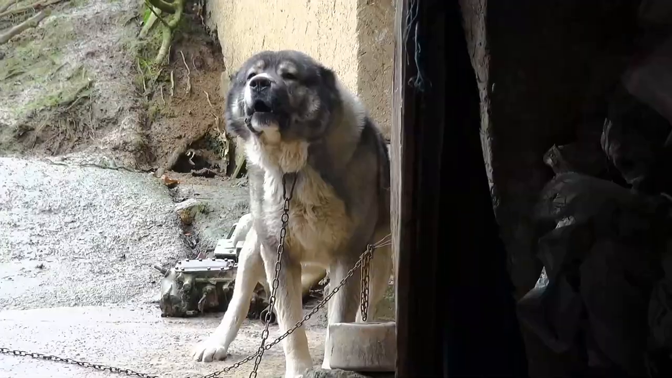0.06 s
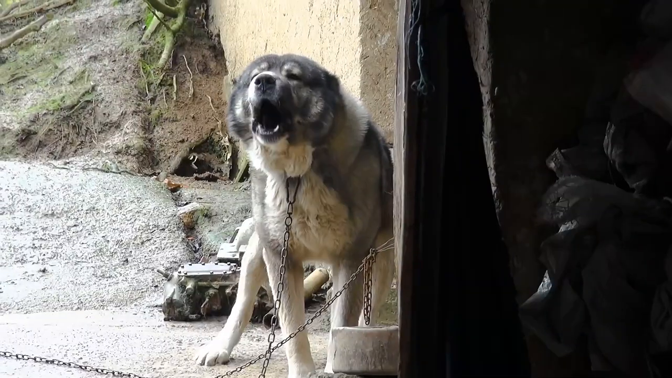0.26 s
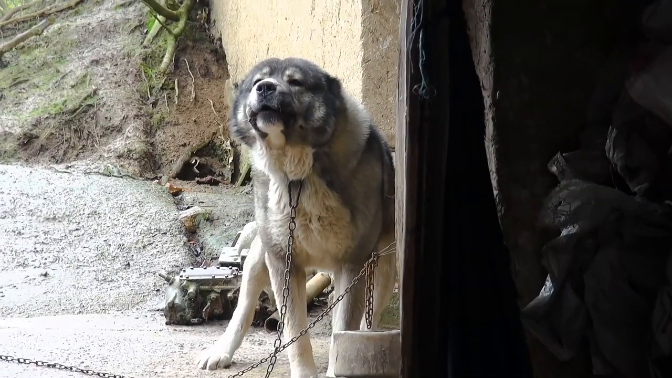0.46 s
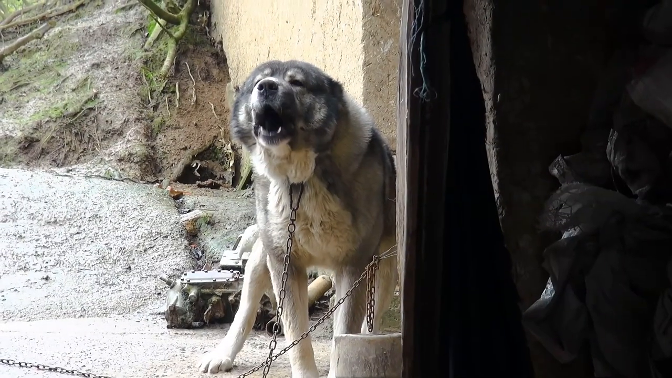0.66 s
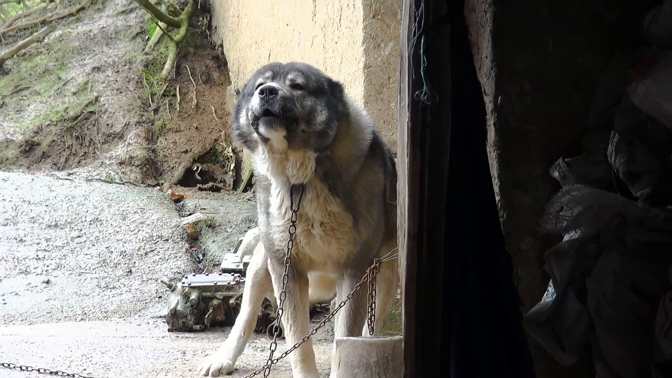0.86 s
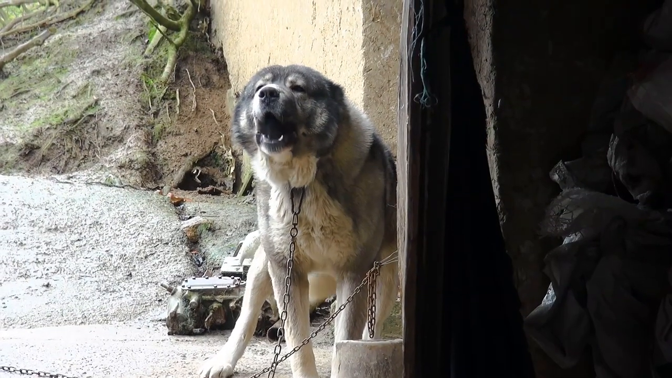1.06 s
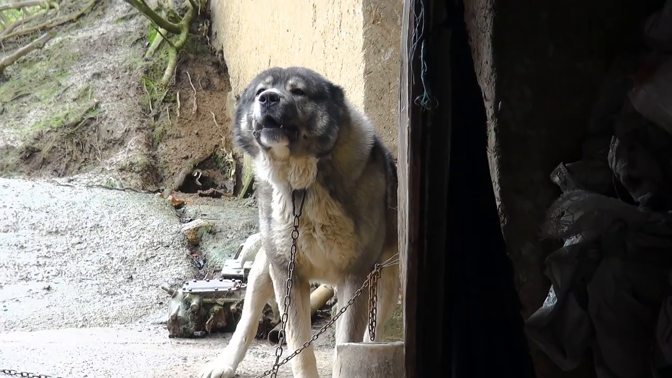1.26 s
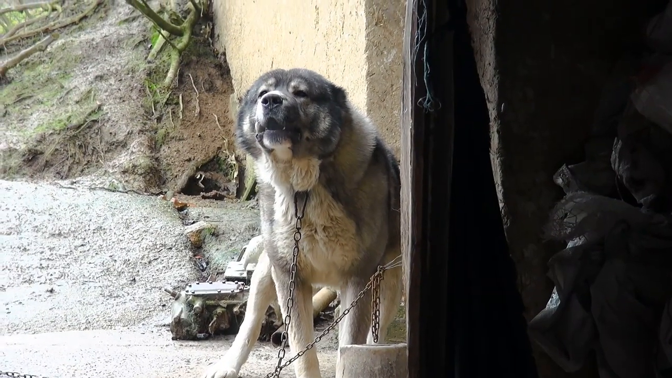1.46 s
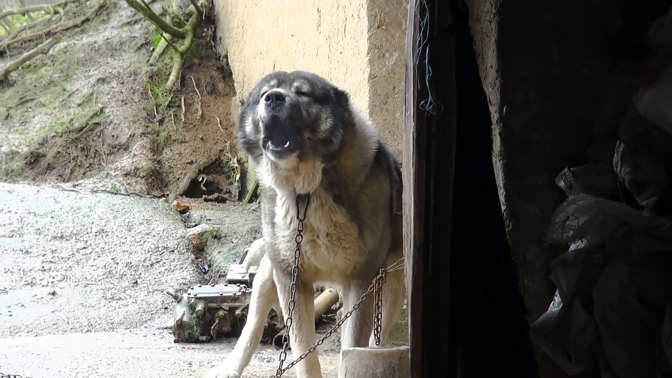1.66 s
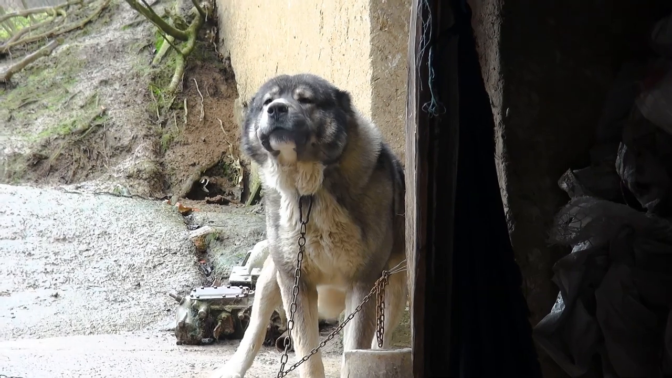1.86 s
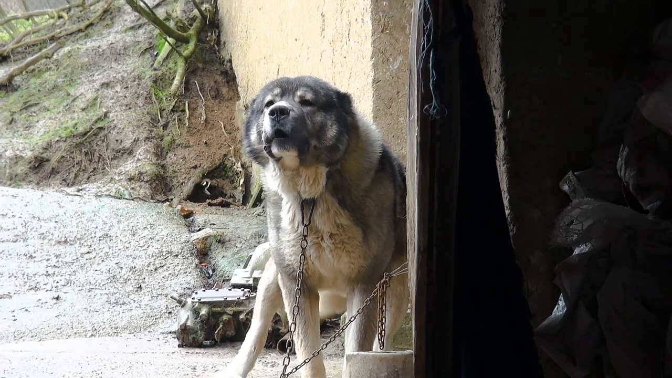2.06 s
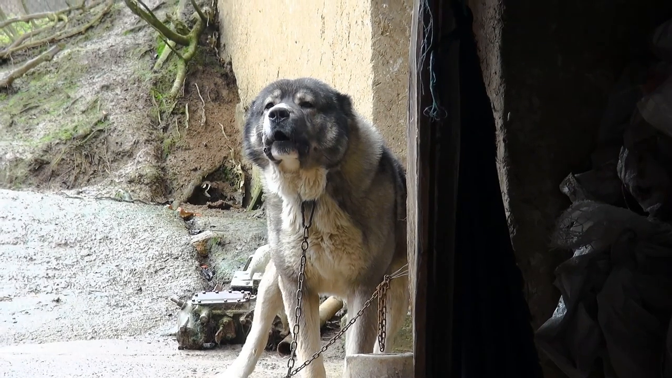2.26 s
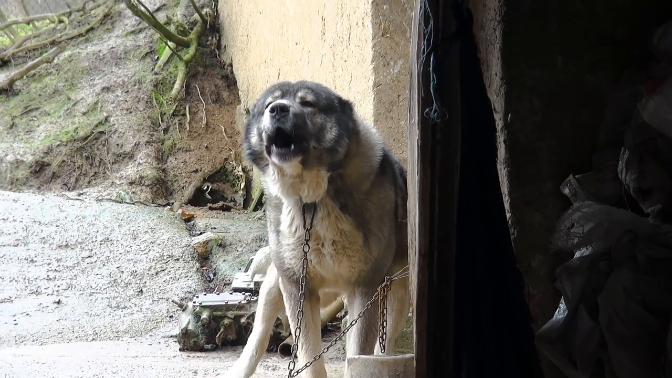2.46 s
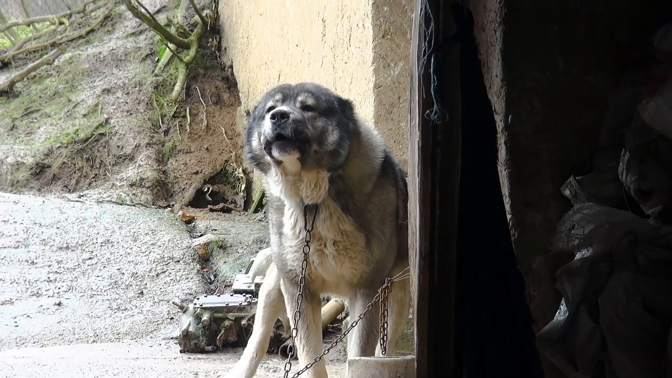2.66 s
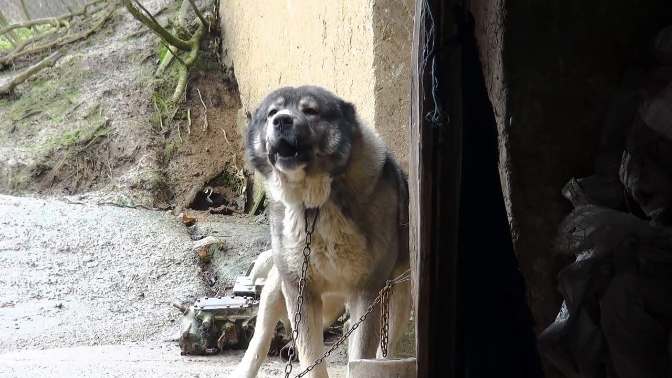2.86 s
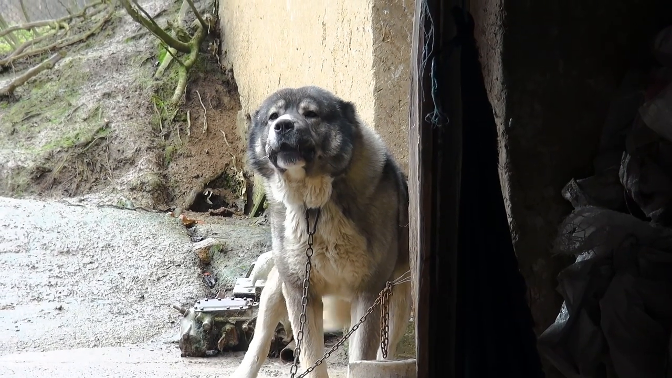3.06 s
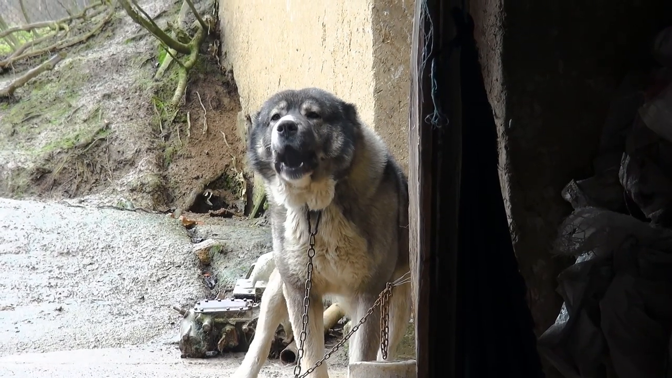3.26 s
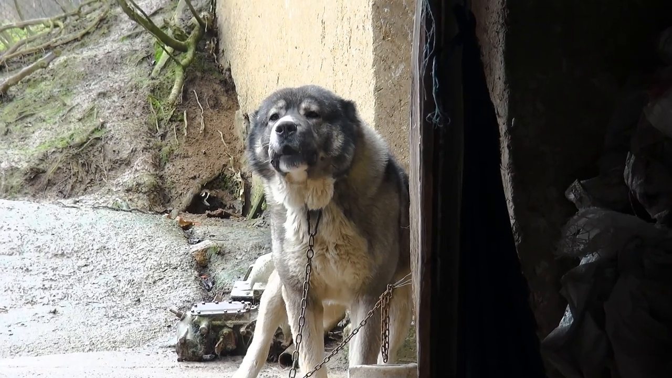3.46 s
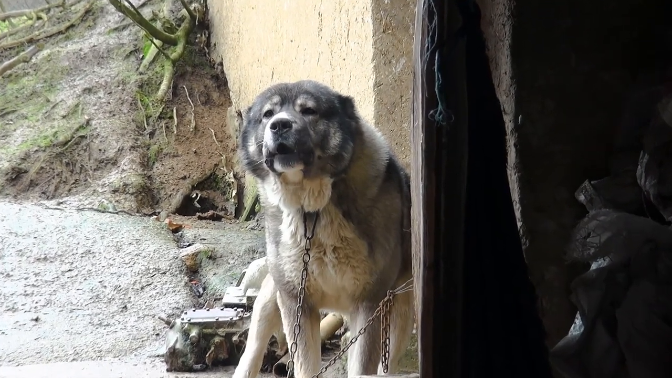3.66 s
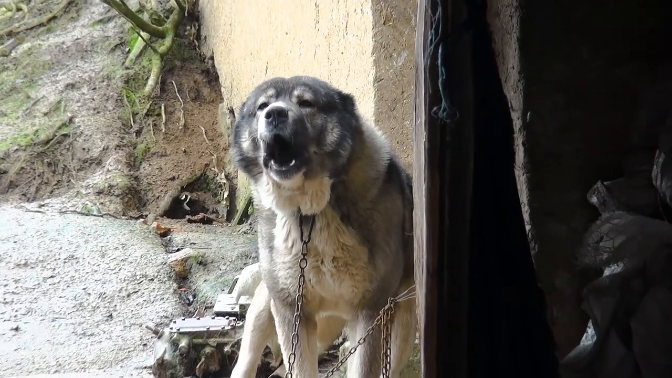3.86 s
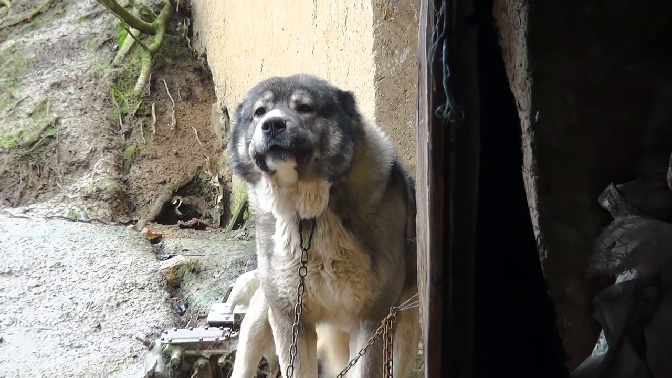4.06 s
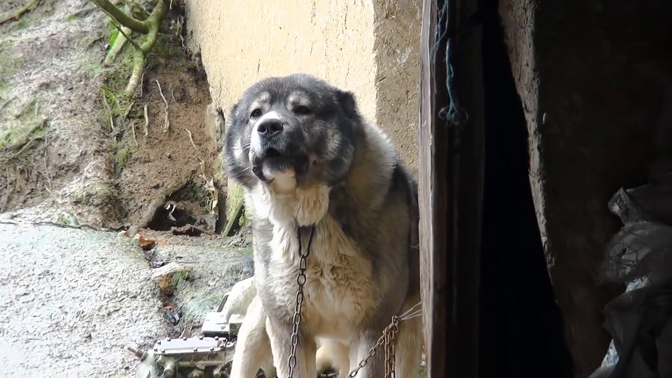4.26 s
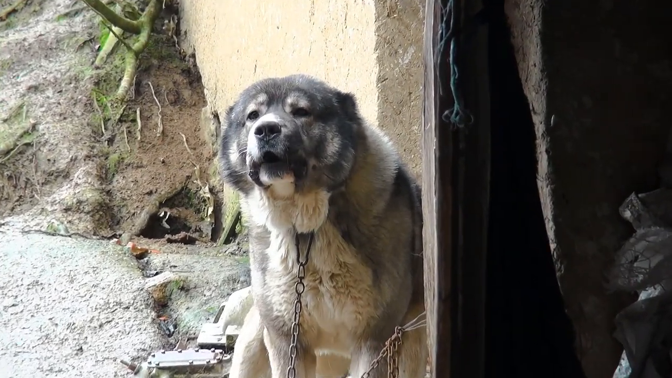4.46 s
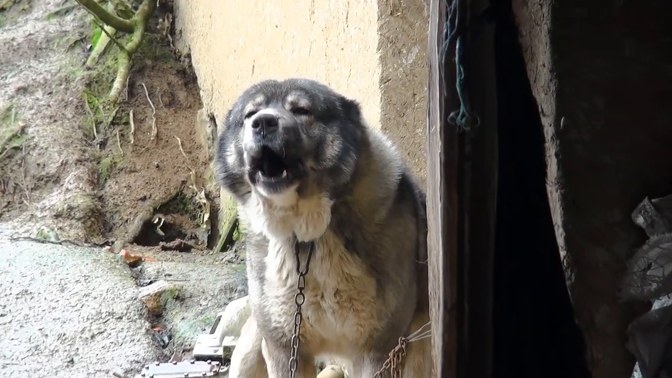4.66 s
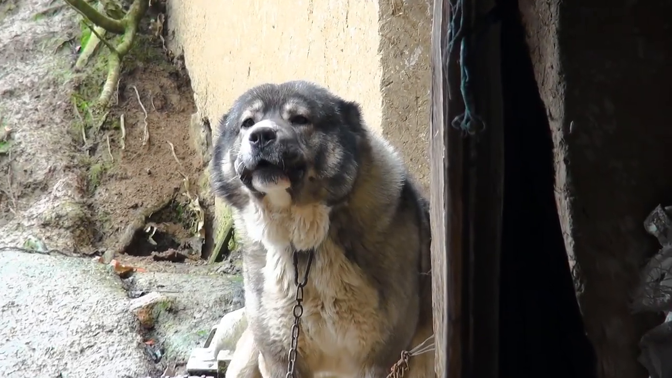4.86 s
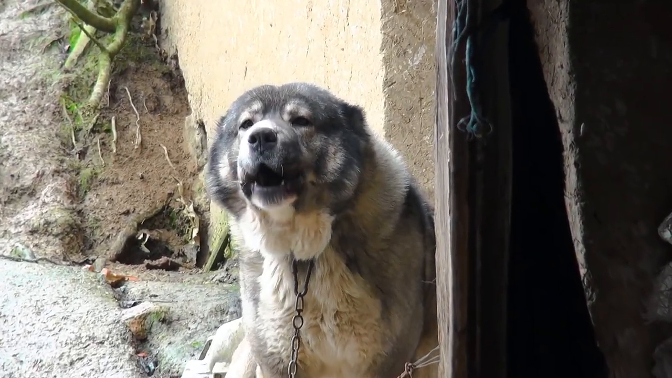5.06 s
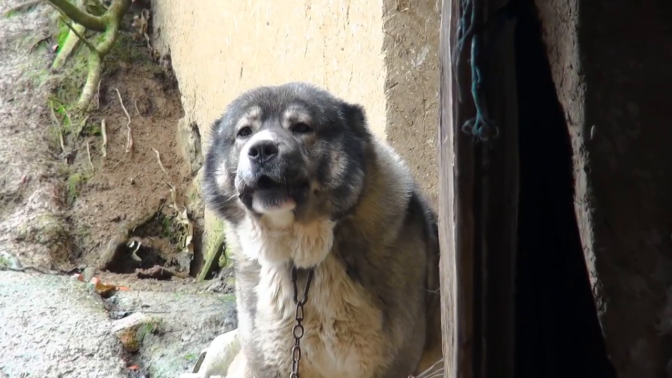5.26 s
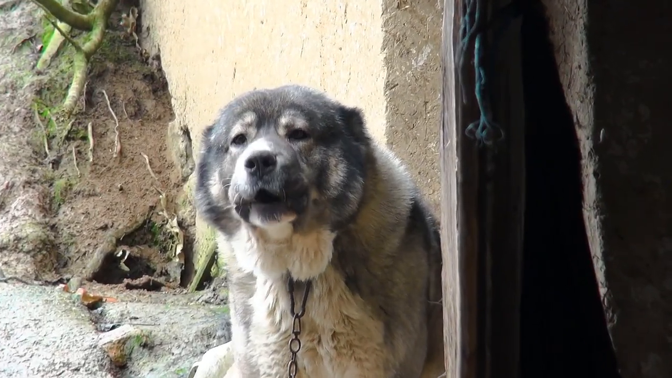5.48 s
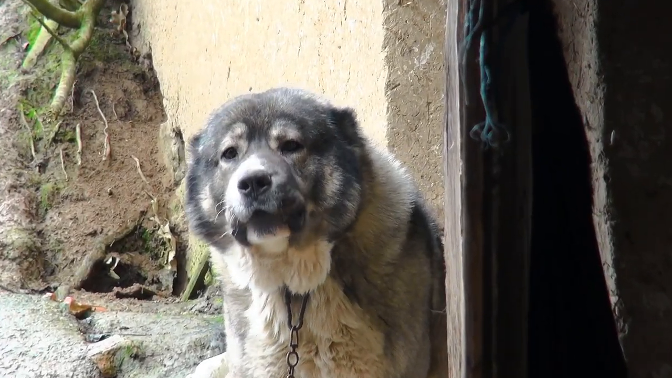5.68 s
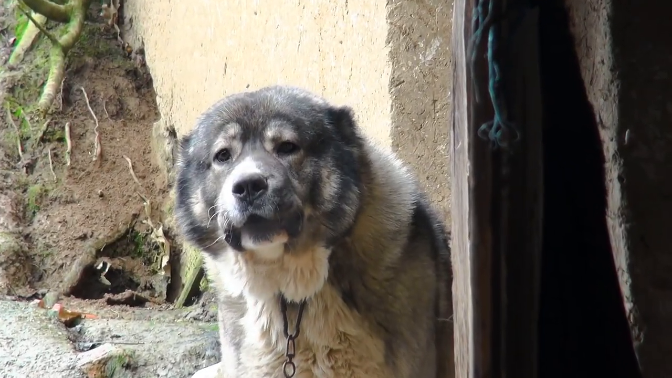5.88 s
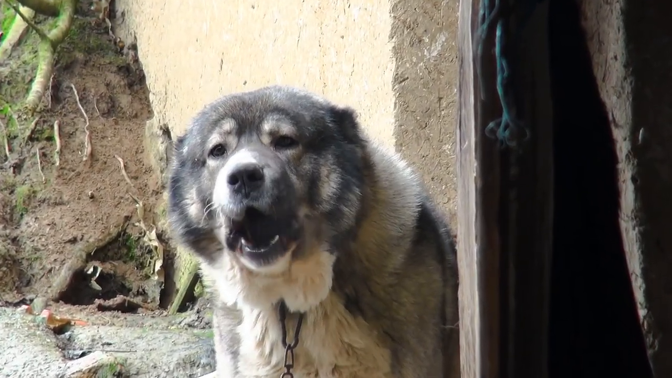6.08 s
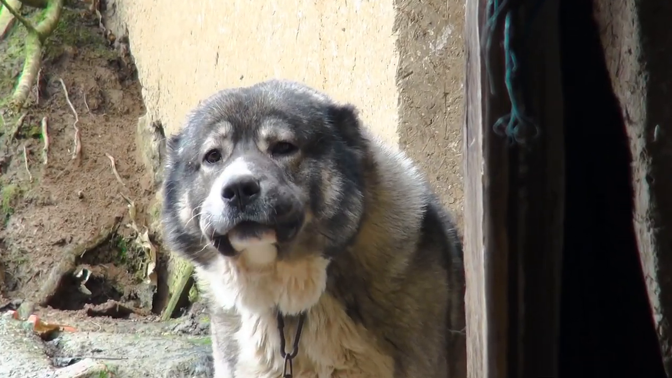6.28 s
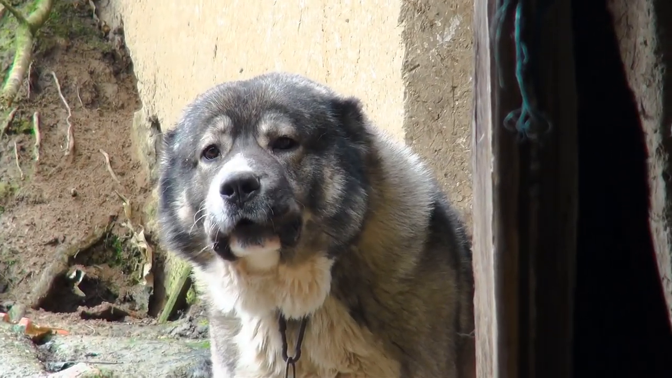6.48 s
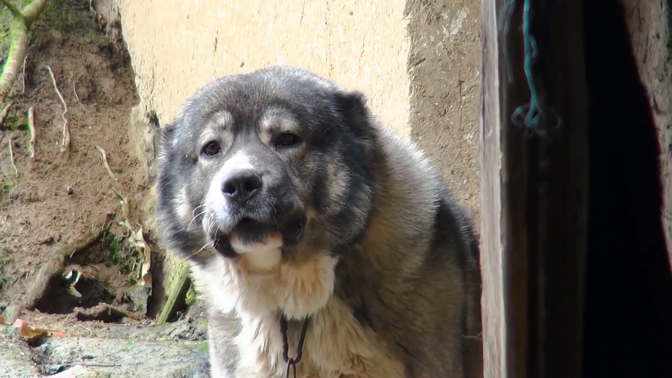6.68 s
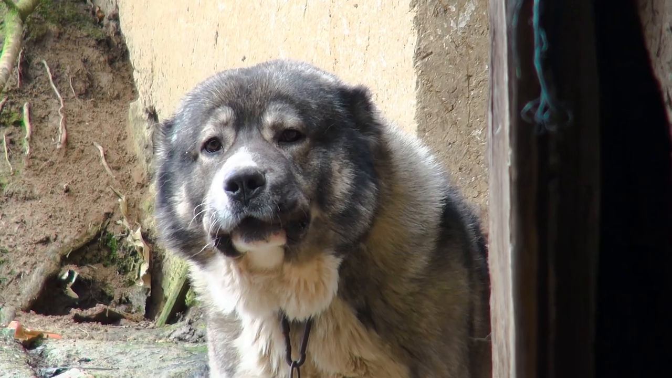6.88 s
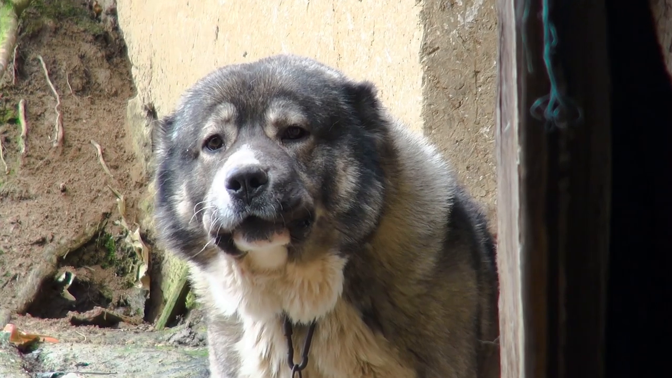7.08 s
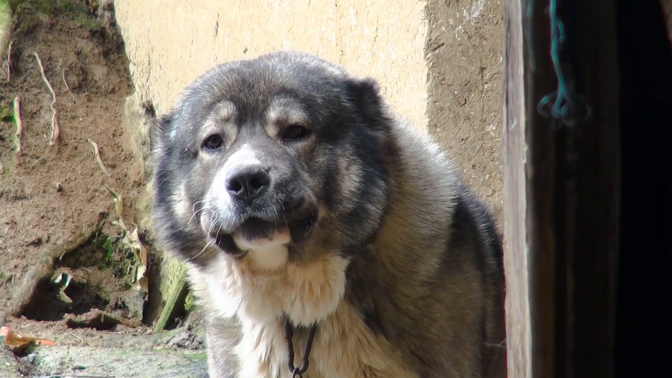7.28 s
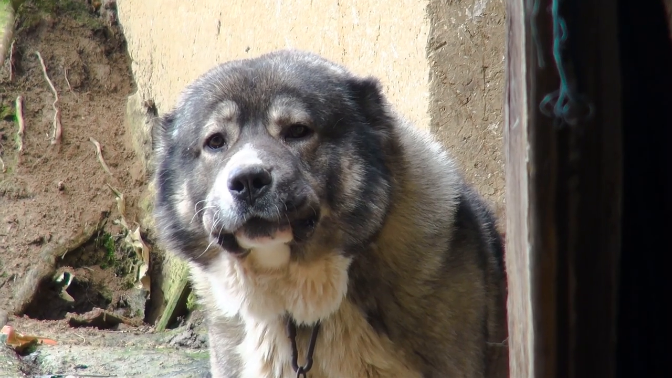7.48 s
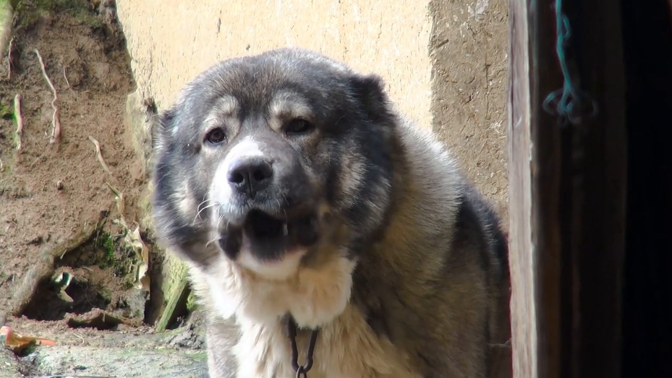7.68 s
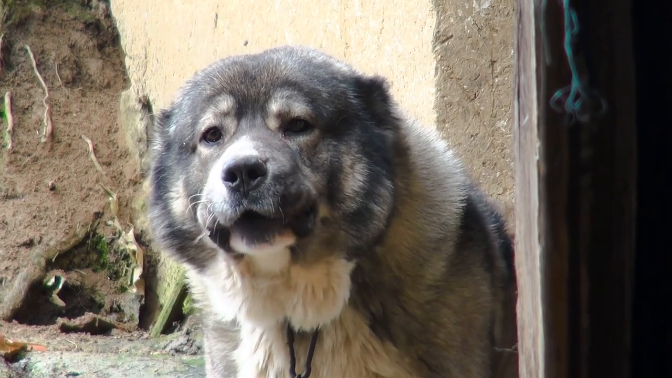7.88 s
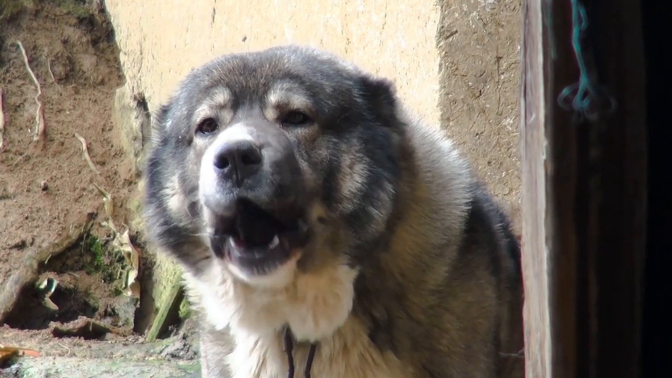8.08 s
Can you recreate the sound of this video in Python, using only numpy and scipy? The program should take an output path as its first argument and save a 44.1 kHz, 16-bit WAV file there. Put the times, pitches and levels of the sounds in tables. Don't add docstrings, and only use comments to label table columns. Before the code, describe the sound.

The tail of an earlier bark cuts off at the start, with a tiny dip near 0.1 s and a short growl. A large dog then barks three times at about 0.3, 0.65 and 1.1 s: loud, deep-chested, rough, each jumping up in pitch and snapping shut, with moans between and hissing breath. A faint rattling growl leads to a lone bark at 1.7, another growl to three barks at 2.4, 2.8 and 3.3. After a growl comes one bark at 3.9, more growling, three at 4.65, 5.0 and 5.4, and one at 6.1. Between 3.4 and 6.1 a tiny distant bird whistles downward and buzzes. Near quiet follows, then a long deep growl from 7.0 to 7.7 breaks into two barks at 7.75 and 8.1. A soft outdoor hush runs throughout; the shed rings about a third of a second, and limiting flattens the barks.

```python
import sys
import numpy as np
from scipy import signal
from scipy.fft import rfft, irfft, next_fast_len
from scipy.io import wavfile
from scipy.ndimage import uniform_filter1d

SR = 44100
rng = np.random.default_rng(int(sys.argv[2]) if len(sys.argv) > 2 else 0)


def materialize(psi):
    bounded = np.clip(np.atleast_2d(psi).T, -1, 1)
    quanta = np.round(bounded * 32767).astype(np.int16)
    wavfile.write(sys.argv[1], SR, quanta)


def gain_from_db(level_db):
    decades = np.asarray(level_db, float) / 20
    return 10 ** decades


N = 358521

# pitch_hz, level_db (per Hz)
HUSH = [(20, -9.5), (80, -8), (160, -4.5), (700, -10), (2000, -17.5), (8000, -22.5), (12000, -25.5),
        (16000, -34)]
# first_hz, last_hz, buzz_depth_hz
BUZZ_SHAPE = (5280, 4950, 220)
CHIP_SHAPE = (4300, 4200, 30)
SLIDE_SHAPE = (3850, 3000, 30)
# start_s, length_s, level_db
BUZZES = [
    (3.438, .053, -70),
    (4.394, 0.11, -54.5),
    (4.932, .054, -53),
    (5.974, .13, -54),
]
CHIPS = [
    (3.61, .03, -60),
    (4.135, .03, -58),
    (5.189, .031, -62),
    (5.71, .035, -54.5),
]
SLIDES = [
    (3.635, .07, -55.5),
    (4.16, 0.059, -51),
    (5.224, .07, -57.5),
    (5.74, .062, -53.5),
]
# pitch_hz, fade_s
SHED_FADE = [(150, .3), (300, .27), (430, .31), (850, .28), (1700, .28), (3400, .27), (7000, .3),
             (14000, .18)]
# pitch_hz, side_minus_mid_db
SHED_WIDTH = [(40, 1.5), (200, -15.5), (500, -6), (1000, -9.5), (2000, -8.5), (4000, -6.5), (8000, -4),
              (13000, -6)]
# pitch_hz, left_minus_right_db
SHED_LEAN = [(40, 2), (125, 1), (250, 0), (500, 3), (1000, -1), (2000, 1.5), (8000, 2), (13000, -5.2)]
# pitch_hz, width_hz, level_db
CHEST = [(147, 90, -10), (264, 80, -1), (360, 20, -9), (420, 50, -8.5), (640, 91, -20.5)]
SHUT_MOUTH = [(760, 270, -7), (1010, 120, -12), (1190, 140, -20), (1500, 60, -12), (1762, 200, -9.5),
              (2283, 210, -16.5), (3090, 170, -24.5), (4970, 1600, -41.5), (8150, 300, -33)]
TEETH = [(3010, 490, 1), (4270, 1000, 3), (4990, 830, 2.5), (6150, 790, -2), (8540, 1200, -13),
         (10500, 2700, -20.5), (13500, 11000, -30)]
OPEN_MOUTH = [(527, 175, -5), (843, 441, 0), (1474, 467, -11), (1774, 227, -1.5), (2370, 170, -26),
              (2970, 2900, -36.5)]
# start_s, end_s, rattle_db, chest_db, change_by_end_db
GROWLS = [
    (0.073, 0.237, -43.5, -43, 2),
    (1.36, 1.66, -57.5, -61, 2.5),
    (2.04, 2.41, -59, -62, 2),
    (3.52, 3.867, -61.5, -64, 1.5),
    (4.221, 4.611, -59.5, -62.5, -2.5),
    (7.009, 7.707, -49, -39.5, -5.5),
]
# time_s, flaps_per_s
FLAP_RATE = [(0, 68), (7.03, 67.3), (7.12, 69.8), (7.3, 71.2), (7.7, 70)]
# first_s, first_db, last_db
FLAP_TRAINS = [
    (1.404, -34, -34.5),
    (2.068, -35, -29.5),
    (3.537, -34, -37.5),
    (4.26, -36, -30),
    (7.025, -41, -26.5),
]
# spacing_s, flap_count
FLAP_TIMING = [(.0438, 6), (.0448, 7), (.0447, 7), (.0461, 8), (.028, 2)]
# time_s, pitch_hz, level_db, fundamental_db, roughness (0-1)
EARLIER_BARK = [(0, 420, -25.5, -6, 1), (.03, 400.4, -48.5, -6.5, 0.95)]
# time_s, level_db
EARLIER_AIR = [(0, -52), (.025, -60), (.08, -91.5)]
# full_voice_s, held_s, level_db, top_pitch_hz, roughness (0-1)
RUNS = [
    [(.283, 0.12, -1, 432.9, 0.9), (.65, 0.12, -0.5, 447.8, 0.88), (1.083, .08, -3.5, 420, 0.85)],
    [(1.71, 0.11, -0.5, 428.7, 0.78)],
    [(2.44, .13, -1.5, 442.1, 0.86), (2.833, 0.11, -4, 441.6, 0.54), (3.268, 0.078, -4.5, 411.4, 1)],
    [(3.895, 0.11, -0.5, 424, 0.93)],
    [(4.653, 0.14, -3, 430, 0.85), (5.035, .115, -2.5, 438.7, 0.48), (5.433, 0.071, -1.5, 405, 0.96)],
    [(6.124, .11, -4, 430, 0.97)],
    [(7.743, 0.14, -4.5, 446.8, 1), (8.085, .12, -2.5, 430, 0.23)],
]
# attack_s, from_hz, from_db, pitch_share at full voice,
# fundamental_db at full voice, fundamental_db at closing, top_share (part of the bark before its top)
PLACES = [
    (.024, 250, -39, .76, -13, -6, .42),
    (.036, 250, -30.5, .89, -6.5, -6, .5),
    (.025, 285, -16.5, 0.98, -7, -11, .3),
]
PLACE_AIR_DB = [0, -3.5, -6]


def rms_one(x):
    return x / np.sqrt(np.mean(x ** 2) + 1e-20)


def at_hz(points, hz):
    table = np.array(points)
    return np.interp(np.log(hz + 1), np.log(table[:, 0]), table[:, 1])


def drift(hz):
    smooth = signal.butter(2, hz, fs=SR, output="sos")
    return rms_one(signal.sosfilt(smooth, rng.standard_normal(N)))


def hush():
    mid, side = rfft(rng.standard_normal((2, N))) * gain_from_db(at_hz(HUSH, np.fft.rfftfreq(N, 1 / SR)))
    return gain_from_db(-61.5) * rms_one(irfft(np.array([mid + 0.29 * side, mid - 0.52 * side]), N))


def bird():
    out = np.zeros(N)
    kinds = [(BUZZ_SHAPE, BUZZES), (CHIP_SHAPE, CHIPS), (SLIDE_SHAPE, SLIDES)]
    notes = [row + shape for shape, rows in kinds for row in rows]
    for start_s, length_s, level_db, first_hz, last_hz, buzz_hz in notes:
        u = np.linspace(0, 1, int(length_s * SR))
        uneven = .012 * np.repeat(rng.standard_normal(60), 100)
        warble = np.sin(np.cumsum(2 * np.pi * 170 / SR + uneven[:len(u)]))
        hz = last_hz + (first_hz - last_hz) * (1 - u) ** 1.4 + buzz_hz * warble
        whistle = np.sin(2 * np.pi * np.cumsum(hz) / SR)
        at = int(start_s * SR)
        out[at:at + len(u)] += gain_from_db(level_db) * np.sin(np.pi * u) ** 0.26 * whistle
    blur = rng.standard_normal((2, 8000)) * gain_from_db(-60 * np.arange(8000) / (.3 * SR))
    blur[:, 0] = 14
    return gain_from_db(-26.0) * signal.fftconvolve(out[None], blur)[:, :N]


def shed(x, boom_hz, boom_db):
    size = next_fast_len(N + SR)
    hz = np.fft.rfftfreq(size, 1 / SR)
    fade_s = at_hz(SHED_FADE, hz)
    tails = []
    for lags_s in rng.uniform(.006, 0.035, (2, 14)):
        tail = 0
        for k, lag_s in enumerate(lags_s):
            bounce = gain_from_db(-60 * lag_s / fade_s) * np.exp(-2j * np.pi * hz * lag_s)
            tail = tail + (-1) ** k * bounce / (1 - bounce)
        tails.append(tail / np.sqrt(len(lags_s)))
    boom = gain_from_db(boom_db) / (1 + 2j * (hz - boom_hz) / 1.8)
    mid = 1 + tails[0] + boom
    side = gain_from_db(at_hz(SHED_WIDTH, hz) + 2.5) * tails[1]
    lean = gain_from_db(at_hz(SHED_LEAN, hz) / 2)
    ears = np.array([(mid + side) * lean, (mid - side) / lean])
    return irfft(rfft(x, size) * ears, size)[:, :N]


def in_time(tables, level_column):
    t = np.arange(N) / SR
    s, *columns = np.transpose(np.concatenate(tables))
    columns[level_column] = gain_from_db(columns[level_column] / 3)
    curves = [np.interp(t, s, c) for c in columns]
    sounding = sum((t >= rows[0][0]) & (t <= rows[-1][0]) for rows in tables)
    curves[level_column] = curves[level_column] ** 3 * uniform_filter1d(sounding * 1., size=151)
    return curves


def throat(x, modes):
    out = 0
    for k, (hz, width_hz, level_db) in enumerate(modes):
        r = np.exp(-np.pi * width_hz / SR)
        stage = [(1 - r * r) / 2, 0, (r * r - 1) / 2, 1, -2 * r * np.cos(2 * np.pi * hz / SR), r * r]
        out = out + (-1) ** k * gain_from_db(level_db) * signal.sosfilt([stage, stage], x)
    return out / np.sqrt(uniform_filter1d(out ** 2, size=1301) + 1e-12)


def folds(hz, rough, jitter, shimmer_db, halving_db, air):
    cycles = np.cumsum(hz) / SR
    chance = rng.standard_normal((int(cycles[-1]) + 400, 2))
    k = np.arange(1, int(cycles[-1]))
    at = np.interp(k, cycles, np.arange(N))
    rough_here = rough[at.astype(int)]
    late = jitter * rough_here * chance[k, 0] * SR / hz[at.astype(int)]
    at = np.clip(at + late, 0, N - 2)
    size = gain_from_db(rough_here * (shimmer_db * chance[k, 1] + halving_db * (-1.) ** k))
    clicks = np.zeros(N)
    np.add.at(clicks, at.astype(int), size * (1 - at % 1))
    np.add.at(clicks, at.astype(int) + 1, size * (at % 1))
    puffs = (.5 + .5 * np.cos(2 * np.pi * cycles)) * rng.standard_normal(N) * np.sqrt(hz / SR)
    return clicks + air * rough * puffs, cycles


def growl_shapes():
    shapes = []
    for start_s, end_s, rattle_db, chest_db, change_db in GROWLS:
        shapes.append([(start_s, rattle_db - 10.5, chest_db - 10.5, .4),
                       (start_s + .04, rattle_db, chest_db, .4),
                       (end_s, rattle_db + change_db, chest_db + change_db, .75)])
    return shapes


def heavy_flaps():
    heavy = np.zeros(N)
    for (first_s, first_db, last_db), (spacing_s, count) in zip(FLAP_TRAINS, FLAP_TIMING):
        chance = rng.standard_normal((count, 2))
        s = first_s + spacing_s * np.arange(count) + .002 * chance[:, 1]
        level_db = np.linspace(first_db, last_db, count) + 2 * chance[:, 0] - 6
        heavy[(s * SR).astype(int)] = gain_from_db(level_db)
    push = uniform_filter1d(heavy, size=133, origin=-66)
    return signal.lfilter([1], [1, -np.exp(-1 / (0.008 * SR))], push)


def growl():
    rattle, chest_db, rough = in_time(growl_shapes(), level_column=0)
    hz = np.interp(np.arange(N) / SR, *np.transpose(FLAP_RATE)) * (1 + .008 * drift(5))
    rough = np.clip(rough, 0, 1)
    loose, _ = folds(hz, rough, jitter=.15, shimmer_db=6, halving_db=0, air=2.5)
    steady, _ = folds(hz, rough, jitter=.045, shimmer_db=4, halving_db=0, air=.8)
    growling = np.minimum(rattle * 1e4, 1)
    chest = gain_from_db(chest_db - 3) * growling * throat(steady, CHEST)
    flaps = heavy_flaps() * throat(rng.standard_normal(N), CHEST[1:] + SHUT_MOUTH)
    return rattle * throat(loose, SHUT_MOUTH) + chest + flaps


def bark_voice_rows(run):
    rows = []
    moan_rough = .25
    for place, (s, held, level_db, hz, rough) in enumerate(run):
        attack, from_hz, from_db, share, full_db, closing_db, top_share = PLACES[place]
        last = place == len(run) - 1
        if place == 2:
            rows.append((s - attack - .05, 247.4, -33.5, -3, moan_rough))
        start_pure_db, start_rough = (-3, moan_rough) if place else (full_db, rough)
        pure_db, pure_loss_db = .5, -18 * rough
        bend = share + .72 * (.97 - share)
        shut = s + held + .04
        shut_pure_db = -13 if last else -7.5
        moan_db, moan_pure_db = (-56, -13) if last else (-41, -6.5)
        rows += [(s - attack, from_hz, from_db, start_pure_db, start_rough),
                 (s, share * hz, level_db - 3.5, full_db, rough),
                 (s + top_share * held / 2, bend * hz, level_db - 1.75, full_db, rough),
                 (s + top_share * held, .97 * hz, level_db, pure_db + pure_loss_db, rough),
                 (s + .68 * held, hz, level_db - 3, pure_db + .45 * pure_loss_db, rough),
                 (s + held, .92 * hz, level_db - 7.5, closing_db, rough),
                 (shut, 254.9, -21.5, shut_pure_db, .6 * rough),
                 (shut + .06, 226.25, moan_db, moan_pure_db, moan_rough)]
    return rows


def bark_air_rows(run):
    rows = []
    fall_s = .15
    fall_db = fall_s * (136 if len(run) == 1 else 198)
    for place, (s, held, level_db, _, _) in enumerate(run):
        attack, top_share = PLACES[place][0], PLACES[place][-1]
        peak_db = -35.5 + PLACE_AIR_DB[place] + .5 * level_db
        rows += [(s - attack, -62),
                 (s + .006, peak_db - 4.5),
                 (s + top_share * held, peak_db),
                 (s + held, peak_db - 13),
                 (s + held + fall_s, peak_db - 13 - fall_db)]
    return rows


def breath():
    bark_gain = in_time([EARLIER_AIR] + [bark_air_rows(run) for run in RUNS], level_column=0)[0]
    growl_gain = gain_from_db(-21) * in_time(growl_shapes(), level_column=0)[0]
    noise = rng.standard_normal(N) * gain_from_db(3.5 * drift(250))
    bands = 0
    for hz, width_hz, level_db in TEETH:
        flicker = gain_from_db(level_db + 4.4 * drift(29))
        bands = bands + flicker * np.sqrt(width_hz) * throat(noise, [(hz, width_hz, level_db)])
    return gain_from_db(8.5) * (bark_gain + growl_gain) * rms_one(bands)


def bark():
    rows = [EARLIER_BARK] + [bark_voice_rows(run) for run in RUNS]
    hz, gain, clean_db, rough = in_time(rows, level_column=1)
    rough = np.clip(rough, 0, 1)
    source, cycles = folds(hz, rough, jitter=.065, shimmer_db=3, halving_db=2.5, air=.6)
    clean = np.minimum(gain_from_db(clean_db + 6.5 * rough * drift(35)), .9)
    no_lows = signal.butter(4, 470, "high", fs=SR, output="sos")
    buzz = signal.sosfilt(no_lows, throat(source, OPEN_MOUTH))
    muffled = signal.sosfilt(signal.butter(1, 900, fs=SR, output="sos"), buzz)
    opening = np.clip(gain / gain_from_db(-9), 0, 1) ** 1.2
    buzz = muffled + opening * (buzz - muffled)
    tone = np.sqrt(2) * np.sin(2 * np.pi * cycles)
    return gain * (np.sqrt(1 - clean ** 2) * buzz + clean * tone)


def scene():
    dog = bark() + breath() + growl()
    return gain_from_db(-4.5) * shed(dog, boom_hz=430, boom_db=-13.5) + bird() + hush()


def roll_off(x):
    return signal.sosfilt(signal.butter(12, 15750, fs=SR, output="sos"), x)


def record(dry):
    t = np.arange(N) / SR
    limit_db, release_db_s = -.4, 134
    over_db = np.maximum(20 * np.log10(np.abs(dry).max(axis=0) + 1e-9) - limit_db, 0)
    held_db = np.maximum.accumulate(over_db + release_db_s * t) - release_db_s * t
    ahead_db = uniform_filter1d(np.roll(held_db, -20), size=41)
    dip = np.clip(np.abs(t - .082) / .008, .03, 1)
    return roll_off(np.clip(dry * gain_from_db(-ahead_db) * dip, -1, 1))


dry = scene()
out = record(dry)
materialize(out)
```